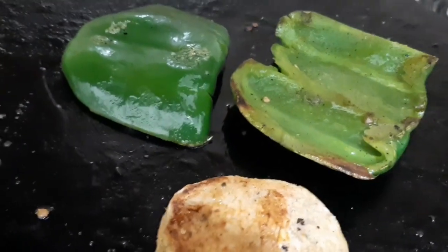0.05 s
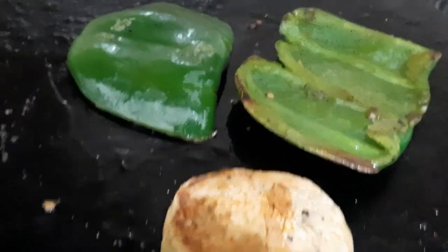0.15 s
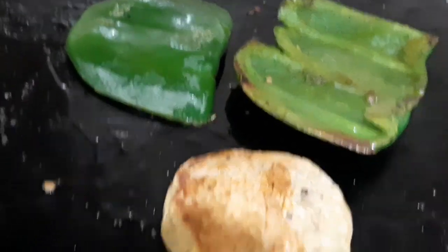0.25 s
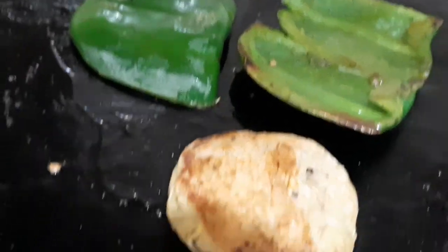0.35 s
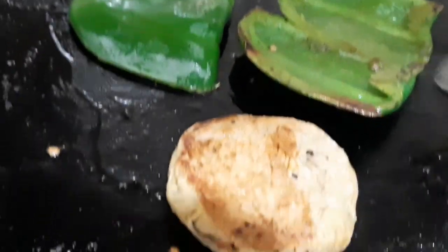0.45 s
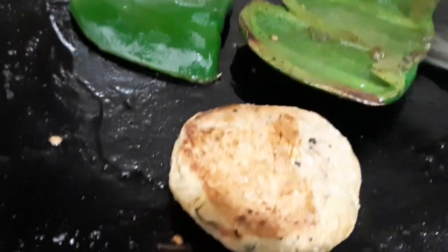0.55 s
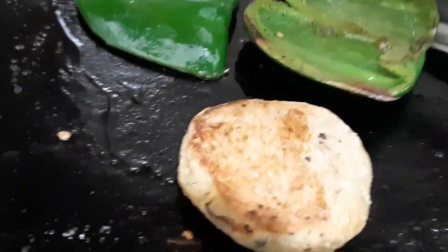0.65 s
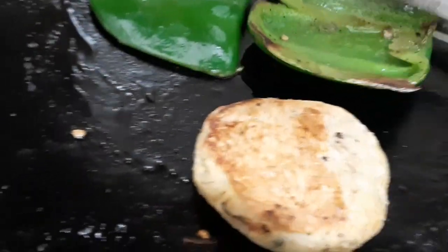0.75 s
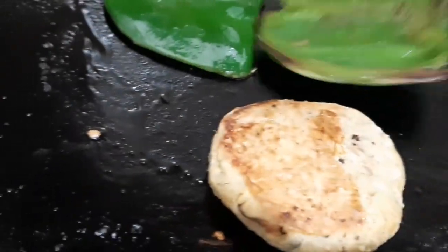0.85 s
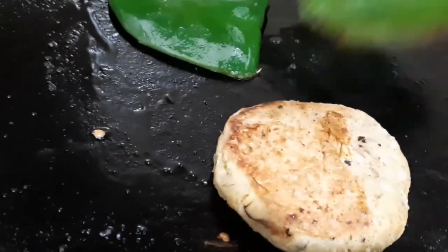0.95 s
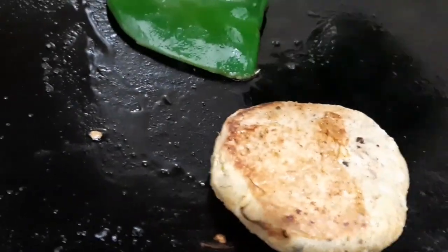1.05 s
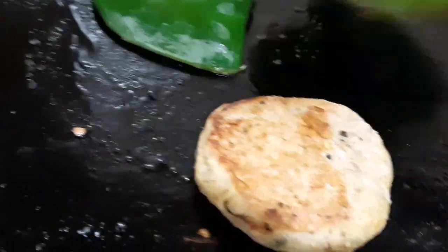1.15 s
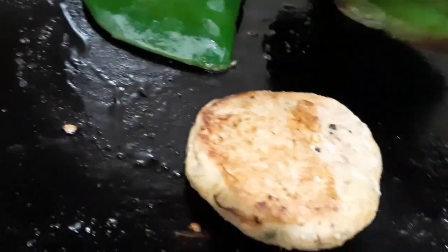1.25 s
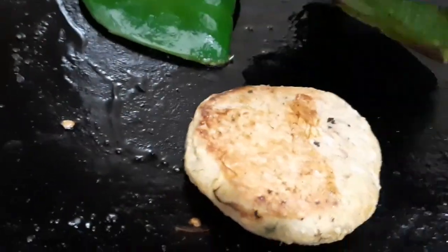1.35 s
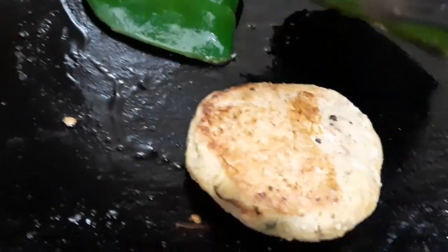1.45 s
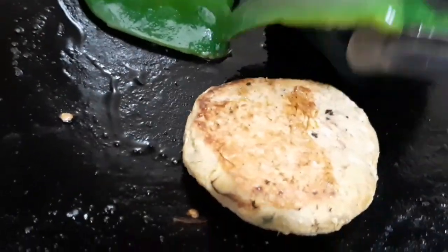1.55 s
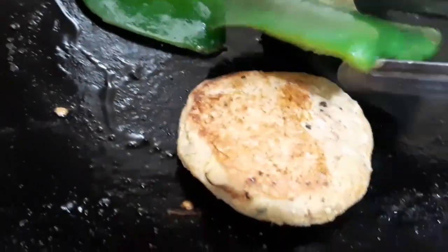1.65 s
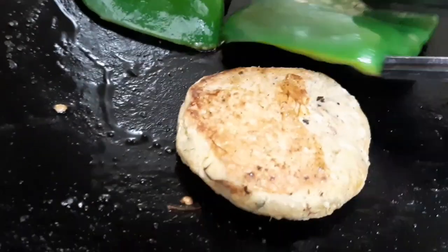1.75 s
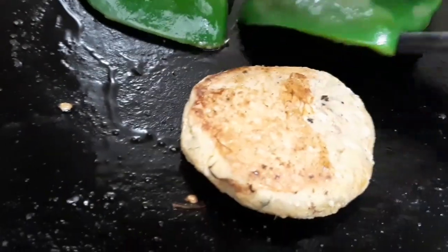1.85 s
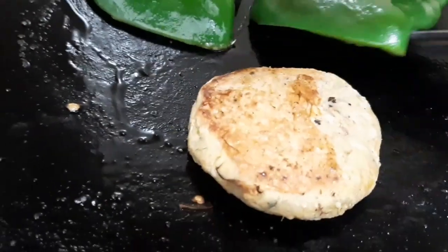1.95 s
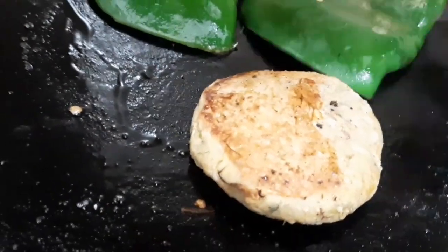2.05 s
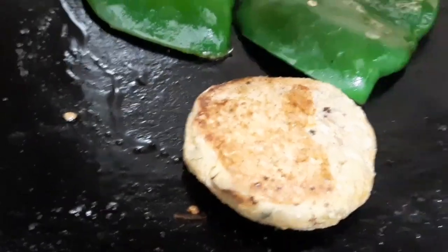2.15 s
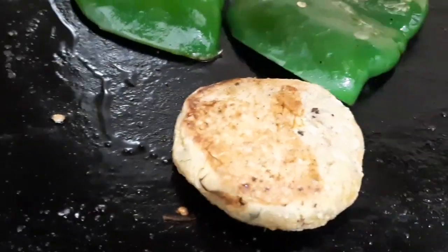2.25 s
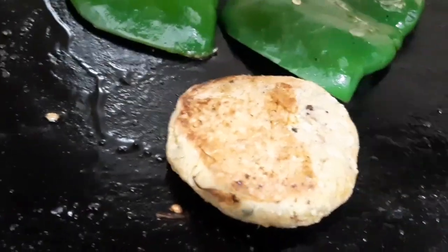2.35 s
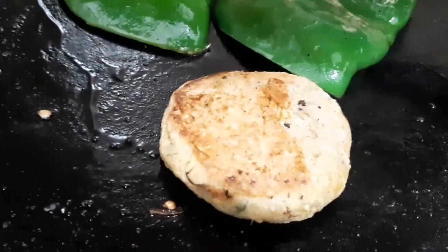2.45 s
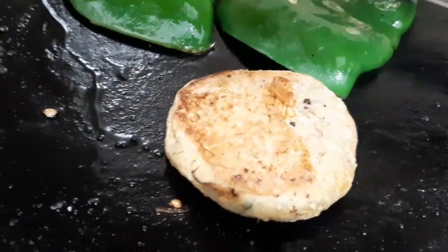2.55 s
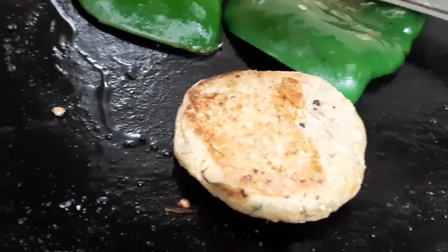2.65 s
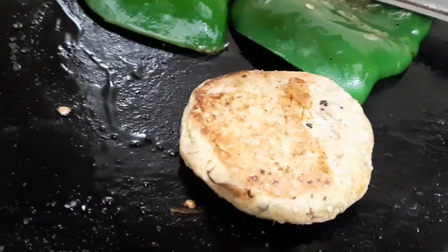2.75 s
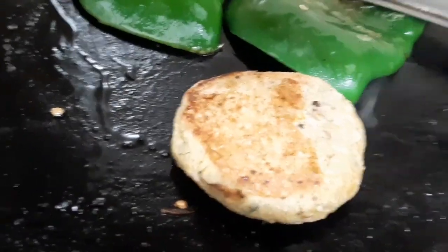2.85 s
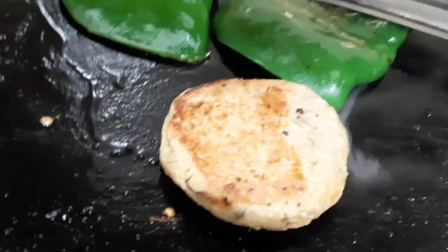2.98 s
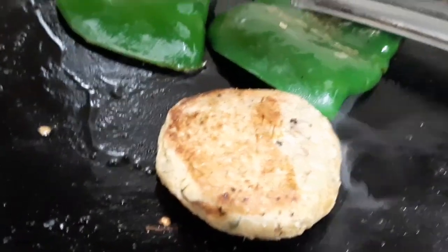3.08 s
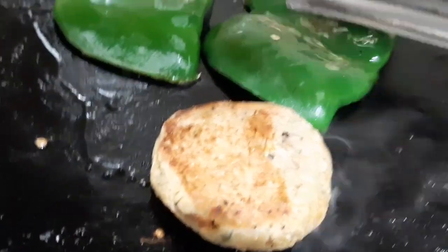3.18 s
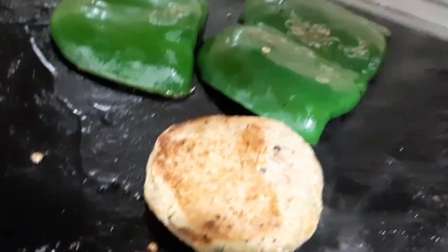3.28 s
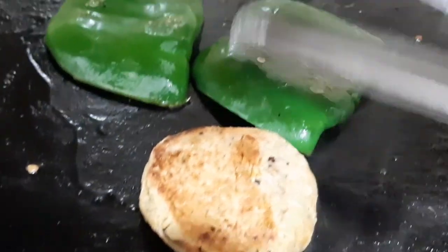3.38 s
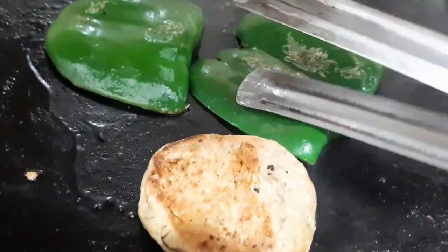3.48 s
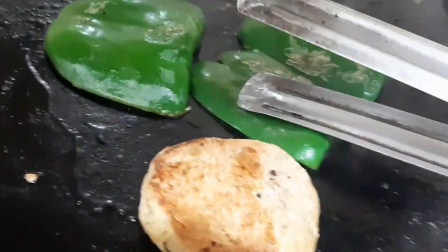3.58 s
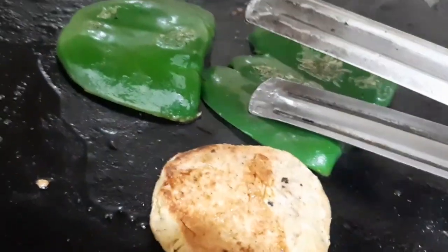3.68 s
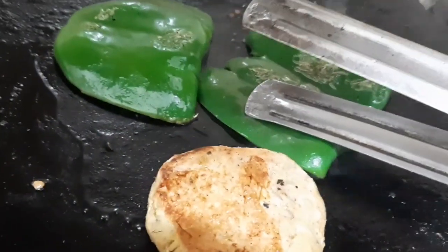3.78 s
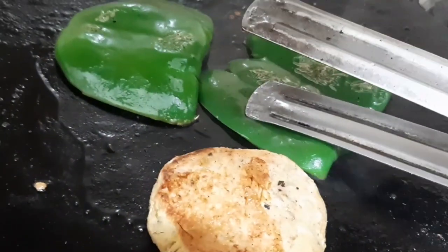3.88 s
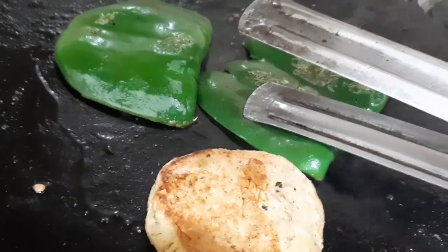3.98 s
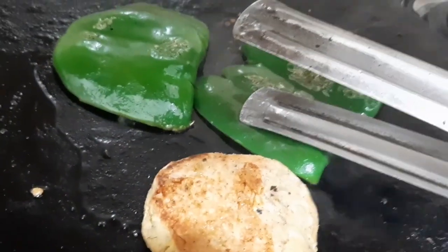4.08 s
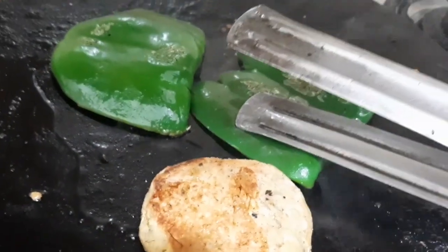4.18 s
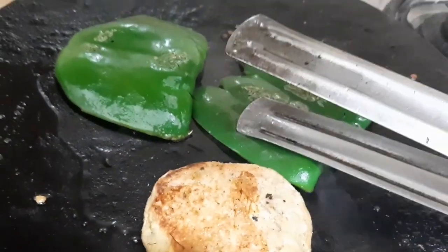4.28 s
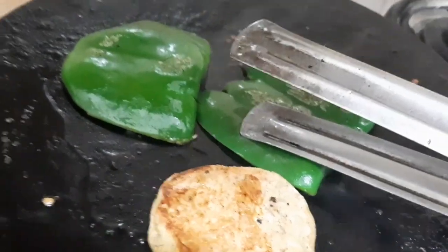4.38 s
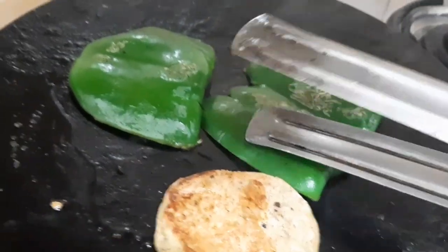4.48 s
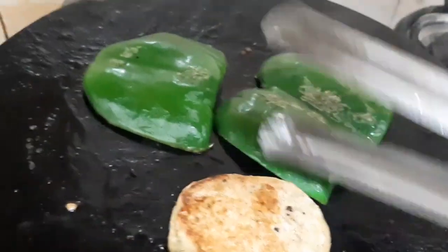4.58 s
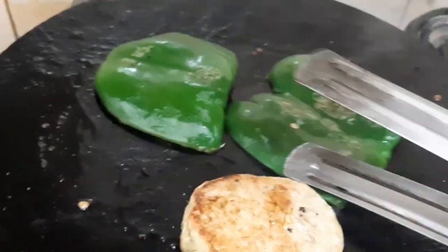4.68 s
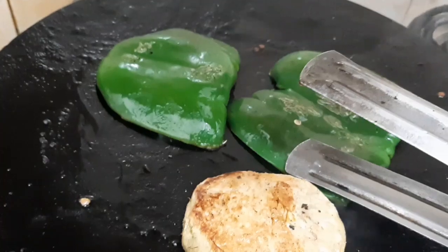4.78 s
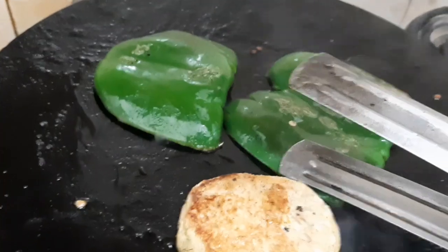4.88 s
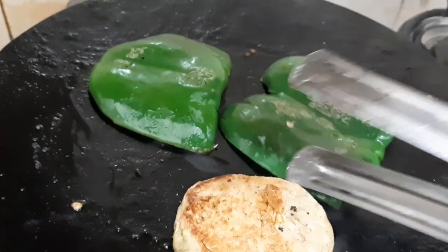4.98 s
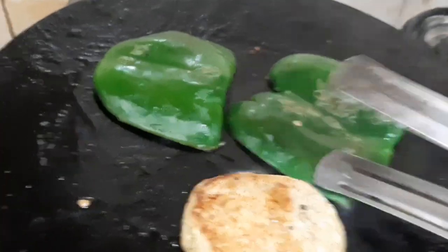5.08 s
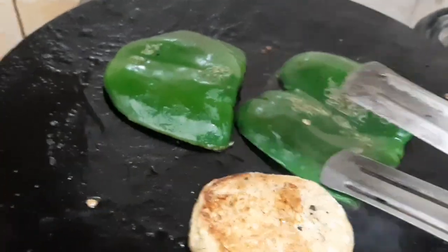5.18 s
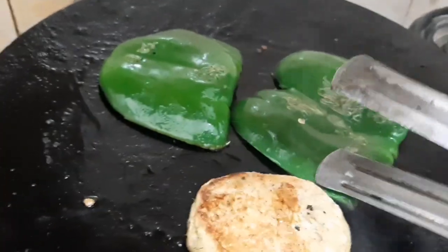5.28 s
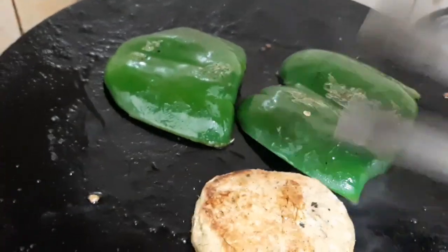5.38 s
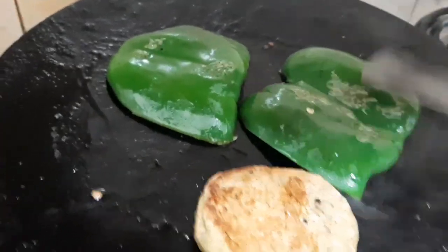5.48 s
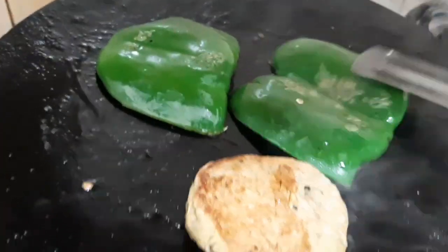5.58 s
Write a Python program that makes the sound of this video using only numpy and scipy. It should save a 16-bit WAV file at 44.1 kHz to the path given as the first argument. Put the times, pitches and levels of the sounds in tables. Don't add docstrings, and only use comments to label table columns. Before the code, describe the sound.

Fine, bright oil crackle runs throughout, close to a stereo microphone in a kitchen with short reflections. First come a dry tong clink, brief gritty scrapes with thin squeals, and snapping drops. After a bouncing metal clink and a quieter stretch, a pepper pressed on the hot plate makes fluttering, hollow steam, fast ticks and rounder wet pops. Late on, a stronger hiss whistles faintly and fades.

```python
import sys
import numpy as np
from scipy import signal
from scipy.io import wavfile
from scipy.ndimage import uniform_filter1d

SR = 44100
rng = np.random.default_rng(int(sys.argv[2]) if len(sys.argv) > 2 else 0)


def rack_gain(trim_db):
    fader = np.asarray(trim_db, float)
    return 10 ** (fader / 20)


def wav_out(sig):
    wavfile.write(sys.argv[1], SR, np.round(np.clip(np.atleast_2d(sig).T, -1, 1) * 32767).astype(np.int16))


N = 248283

# t/s, level/dB, lean to the left/dB
FIZZ_LEVEL = [(0.0, -41, 3), (0.45, -40.5, 2), (0.72, -36.5, 0.5), (0.83, -40.5, 0.5), (0.95, -39.5, 2),
              (1.6, -43.5, 2), (2.46, -43, 2), (2.63, -37.5, 3), (2.66, -32, 3.5), (2.81, -30, 2),
              (3.13, -33.5, 3), (3.46, -36.5, 0.5), (3.6, -33.5, 3.5), (4.1, -35, 3), (4.2, -38.5, 6),
              (4.75, -37.5, 1.5), (5.05, -39.5, 1.5), (5.62, -39, -1)]
# f/Hz, density/dB
FIZZ_COLOUR = [(400, -40), (860, -17.5), (1300, -10), (1550, -8), (2200, -13.5), (3200, -11), (4300, -3),
               (5400, -10), (7500, -5), (8600, -11.5), (9800, -9), (11500, -5.5), (14900, -0.5),
               (16500, -6.5)]
# start t/s, length/s, level/dB, lean/dB
FLARES = [(.15, 0.15, -37.5, 1), (.62, 0.025, -41, 3), (.848, 0.013, -37, -1), (1.05, 0.034, -44, -2),
          (1.18, .13, -45, 2), (1.38, 0.087, -40.5, 0), (1.65, 0.11, -44.5, 3), (1.8, 0.15, -45, 5),
          (1.96, 0.067, -43, 2), (2.09, 0.06, -42.5, -2), (2.28, 0.075, -44.5, 0), (2.49, .05, -46, 6),
          (3.25, 0.11, -39, 4), (3.72, 0.05, -45, 12), (4.84, 0.085, -39.5, -3), (5.1, 0.2, -36, -1.5),
          (5.44, 0.035, -37.5, 1)]
FLARE_RISE, FLARE_FALL = 0.24, 0.96

# t/s, level/dB
DRONE_LEVEL = [(0.0, -56), (0.59, -49), (0.86, -56), (1.77, -57), (1.99, -54.5), (2.34, -56), (3.4, -55),
               (3.68, -57), (5.63, -55.5)]
# f/Hz, density/dB
BURNER_COLOUR = [(18, -68), (30, -27), (91, 8.5), (183, -9.5), (281, -29), (546, -7), (868, -7),
                 (1090, -1.5), (1200, -6), (1560, -48), (2640, -120)]
BURNER_DB = -63.5
# f/Hz, width/Hz, level/dB
PLATE_MODES = [(98, 55, -5.5), (134.9, 7.5, -1), (174.8, 30, 3.5), (227, 59, 2), (330, 92, -7),
               (446.4, 7.2, -7), (705, 9, -8.5)]
# t/s, peak/dB
KNOCKS = [
    (.396, -35.5),
    (.53, -42),
    (1.27, -49),
    (2.07, -46),
    (3.5, -40),
    (5.17, -49.5),
]
# f/Hz, level/dB, t60/s
KNOCK_MODES = [(142.2, -6, 0.56), (196, -6, 0.34), (238.8, 2.5, 0.43), (314, -7.5, 0.42), (440, -8, 0.56)]
# t/s, peak/dB
THUDS = [
    (.17, -41),
    (1.823, -37.5),
]
# f/Hz, level/dB, t60/s
THUD_MODES = [(190, 1, .09), (314, 5, .07), (383, 4, 0.042)]

# t/s, peak/dB, bubble f/Hz, lean/dB, left lag/samples
SPITS = [(0.234, -11, 13600, -3, -3), (0.6855, -16, 6900, 7, -2), (0.7433, -17, 7400, -7, -4),
         (0.8474, -6.5, 9000, -10, 2), (1.2727, -20, 14600, -1, 3), (1.4203, -8.5, 8000, -2, 3),
         (1.6883, -9, 14500, 0, 10), (2.9001, -16, 11500, -3, 4), (3.3766, -15, 4500, -1, 0),
         (5.076, -11, 14500, 0, -3), (5.4217, -17, 7600, 2, -1)]
# t/s, peak/dB, bubble f/Hz, lean/dB
SPECKS = [(0.0577, -21, 13400, -5), (0.1541, -20, 14800, -5), (0.2574, -20, 11900, -4),
          (0.605, -20, 14800, 2), (0.8961, -21, 15200, 7), (1.0286, -24, 14600, 5), (1.1564, -24, 6900, 2),
          (1.2258, -23, 6900, -2), (1.2373, -19, 14800, 8), (1.2524, -23, 7200, -8),
          (1.3068, -22, 14800, 8), (1.3209, -18, 13100, -6), (1.341, -24, 15000, -1),
          (1.4002, -19, 11400, -11), (1.4664, -19, 11000, -5), (1.4935, -22, 3000, -4),
          (1.5114, -26, 7100, -2), (1.6094, -25, 13800, 6), (1.6475, -24, 11700, -9),
          (1.8983, -24, 4700, 6), (1.9054, -23, 13400, -4), (1.9662, -24, 13800, 3),
          (2.0892, -24, 13400, 1), (2.4962, -26, 13300, 2), (2.5353, -24, 13800, 8),
          (2.6276, -18, 13600, 7), (5.4622, -19, 13600, -1)]
THUMP_DB = -26
SNAP_S, RING_S = 0.00008, 0.0003

# t/s, peak/dB
HELD_CLINKS = [(0.17, -14)]
# f/Hz, level/dB, t60/s
HELD_MODES = [(1118, -0.5, .12), (1280, -21, 0.13), (1430, -17, .06), (1880, -21, 0.04), (2780, -15, .04),
              (3450, -11, .035)]
# t/s, peak/dB
FREE_CLINKS = [
    (1.822, -12.5),
    (1.826, -15.5),
    (1.832, -20),
    (1.842, -22),
    (1.854, -26),
]
# f/Hz, level/dB, t60/s
FREE_MODES = [(1132, -6, .12), (1264, -3, .1), (1350, -6, .1), (1565, -1, .075), (1852, -9, .08),
              (2060, -5, .09), (2300, -3, .17), (2575, -13, .09), (2940, -.5, .05), (3340, -9, .07),
              (3698, -13, .1), (3900, -10, .06), (4250, -13, .08), (4888, -12, .12)]
# f/Hz, level/dB, t60/s
FREE_TIP_MODES = [(1280, 0, .7), (2929, -12, .9)]
# t/s, peak/dB
LAST_CLINK = [(1.929, -35)]
# f/Hz, level/dB, t60/s
LAST_MODES = [(1128, 0, .17), (2930, -15, .3)]

# f/Hz, width/Hz, share locked to the slip
SCRAPE_RINGS = [(1124, 36, 2.4), (1300, 130, .7), (2040, 100, .5), (2800, 100, .5), (3850, 160, .2),
                (4710, 120, .2)]
# start t/s, length/s, level/dB, third ring/dB, fourth ring/dB
RASPS = [
    (.305, .015, -47, -18, -21),
    (.392, .025, -43, -13, -16),
    (.455, .045, -50, -8, -14),
    (.515, .06, -40, -10, -17),
    (.585, .043, -38.5, -16, -9),
    (.69, .045, -50, -2, -9),
]
# start t/s, length/s, level/dB
SQUEALS = [
    (.33, .085, -47),
    (.535, .1, -40),
    (.64, .055, -46),
    (.7, .07, -47),
    (.765, .052, -40),
]
STROKE_RISE, STROKE_FALL_S, SQUEAL_FALL_S = 0.12, 0.043, 0.016
WAVER = 0.008
TOP_RINGS_DB = -11.5

# t/s, peak/dB, f/Hz, lean/dB,
# left lag/samples
POPS = [(0.3172, -27, 950, -1, 5), (0.8475, -17, 3900, 7, 1), (0.8487, -20, 3900, 5, 1),
        (0.8497, -21, 3900, 7, 1), (0.8476, -27, 1200, -4, 1), (1.4202, -17, 2400, -1, 3),
        (0.3584, -29, 1200.0, 3, 3), (0.3978, -30, 1200.0, 4, -1), (2.8713, -25, 2200.0, 6, 2),
        (3.0816, -24, 2100.0, 1, 1), (3.1378, -22, 2400.0, 3, 2), (3.3584, -21, 2100.0, -1, -1),
        (3.3618, -22, 2100, -2, 1), (3.5285, -22, 1700.0, -5, 1), (3.5857, -15, 1600.0, -1, 2),
        (3.7548, -19, 3600.0, -3, 2), (3.7754, -15, 1700.0, -4, 3), (3.844, -17, 1700.0, 2, 4),
        (3.923, -23, 2100.0, 3, -10), (3.983, -17, 1700.0, -2, 3), (4.0045, -16, 1900.0, -3, 2),
        (4.2888, -16, 1900.0, -2, 2), (4.3429, -22, 2000, 1, -1), (4.6499, -18, 2500, -4, 3),
        (5.076, -20, 3800, -3, -4)]

# start t/s, length/s, level/dB, hollow f/Hz, lower pocket/dB
PUFFS = [(2.625, 0.063, -41, 4040, 7), (2.665, 0.091, -39.5, 4100, 20), (2.74, 0.18, -37.5, 3900, 9),
         (2.92, 0.22, -38.5, 3880, 12), (3.225, 0.041, -45, 4600, -21), (3.27, 0.092, -39.5, 4500, 0),
         (3.5, 0.047, -36, 3600, -4.5), (3.54, 0.097, -33, 3100, -8.5), (3.66, .13, -34, 3120, -10),
         (3.78, 0.23, -35, 3220, -10), (4.05, 0.23, -44, 3020, -5), (4.22, 0.17, -42.5, 3220, -7.5),
         (4.43, 0.054, -40.5, 3460, -15), (4.68, 0.17, -34.5, 3910, -18), (4.9, 0.083, -54, 3920, -24),
         (5.1, 0.041, -41.5, 3900, -11), (5.22, 0.095, -35.5, 3730, -12), (5.38, 0.089, -66, 4100, -24)]
PUFF_RISE, PUFF_FALL = 0.5, 1
# t/s, f/Hz
POCKET_PITCH = [(2.6, 2520), (3.0, 2450), (3.17, 2380), (3.22, 2000), (3.6, 1960), (5.63, 1950)]
# start t/s, length/s, level/dB
LEAKS = [
    (2.63, .07, -36.5),
    (2.86, 0.042, -35),
    (3.08, 0.13, -39),
    (3.5, 0.17, -37),
    (4.76, 0.067, -38),
    (5.1, 0.19, -33.5),
    (5.4, 0.1, -43),
]
# f/Hz, density/dB
OPEN_HISS_COLOUR = [(500, -27.5), (1000, -32.5), (2500, -3.5), (4800, -6.5), (6200, -5), (7700, -1.5),
                    (8700, -11.5), (11000, -4), (16000, -31)]
OPEN_DB = -1.5
BOIL_DB, BOIL_PER_POCKET = -4.5, 0.82
# start t/s, length/s, level/dB, f/Hz, width/Hz
WHISTLES = [
    (3.225, .19, -43, 3950, 260),
    (3.47, .06, -41, 3760, 260),
    (5.2, .14, -45, 3220, 130),
    (5.15, .18, -43, 7600, 600),
    (5.16, .19, -41, 5700, 1400),
    (3.24, .16, -51, 3120, 220),
    (3.23, .18, -42, 4680, 350),
    (5.14, .17, -47, 4800, 16),
]
WHISTLE_RISE, WHISTLE_FALL = 0.25, 0.3
# t/s, peak/dB, hollow over pocket/dB, lean/dB
TICKS = [(2.6281, -26, 11, 4), (2.7712, -22, 5, -3), (2.933, -23, -4, -2), (2.9851, -22, -4, 3),
         (3.1006, -20, -5, 1), (3.1337, -23, 2, -1), (3.1828, -24, -2, 5), (3.1926, -25, 12, 0),
         (3.1999, -28, 4, 2), (3.2127, -26, -3, 3), (3.2218, -29, 9, -5), (3.2268, -28, 4, 2),
         (3.2334, -26, -5, 5), (3.2475, -21, 7, -5), (3.2615, -20, 10, -4), (3.2733, -25, 2, -2),
         (3.2795, -22, 11, -8), (3.2849, -25, 6, -4), (3.2929, -22, 3, -1), (3.3061, -21, 0, -1),
         (3.3199, -22, 5, 0), (3.3267, -23, -1, 0), (3.3357, -25, -5, 1), (3.3513, -24, 7, -5),
         (3.3861, -22, 3, -6), (3.3933, -22, 4, -5), (3.4055, -22, 4, -3), (3.4107, -28, 2, -7),
         (3.4188, -27, 2, -5), (3.4265, -25, 4, -3), (3.4341, -28, -4, -2), (3.4431, -27, 1, -3),
         (3.4549, -26, -3, -1), (3.4618, -28, 2, -6), (3.48, -22, 6, -4), (3.4954, -25, 6, -2),
         (3.5058, -24, 8, -4), (3.5358, -21, 3, -7), (3.7258, -20, 8, -3), (3.8746, -23, 11, -4),
         (4.0327, -22, 4, -8), (4.038, -20, 14, -3), (4.2481, -26, 5, -4), (4.5074, -25, 12, -4),
         (4.5693, -31, 15, -5), (4.5944, -31, 2, 1)]
TICK_DB, TICK_CYCLES = -3.2, 4

# f/Hz, t60/s
KITCHEN_DECAY = [(250, 0.26), (1000, 0.19), (4000, 0.19), (12000, 0.055)]
# f/Hz, left over right/dB
PORTS = [(60, -5), (110, -2), (200, -0.5), (380, -5), (700, 2), (1290, 3.5), (2380, 1), (4400, -4.5),
         (8120, -2), (15000, 1)]
EDGE_HZ = 15900


def unit_rms(x):
    return x / np.sqrt(np.mean(x ** 2) + 1e-20)


def read(points, hz):
    f, value = np.transpose(points)
    return np.interp(np.log(hz + 1), np.log(f + 1), value)


def curves(rows):
    s, *columns = np.transpose(rows)
    return [np.interp(np.arange(N) / SR, s, column) for column in columns]


def swells(rows, rise, fall=0., fall_s=0.):
    at = np.arange(0, N, 32)
    s, length, db, *columns = np.transpose(rows)[:, :, None]
    age = at / SR - s
    attack = np.clip(age / (rise * length), 0, 1) ** 2
    release = np.exp(-np.maximum(age - length, 0) / (fall * length + fall_s))
    power = (rack_gain(db) * attack * release) ** 2 + 1e-16
    total = power.sum(0)
    values = [np.sqrt(total)] + [(power * column).sum(0) / total for column in columns]
    return [np.interp(np.arange(N), at, value) for value in values]


def colour(x, points):
    log_gain = read(points, abs(np.fft.fftfreq(4096, 1 / SR))).clip(-100) * np.log(10) / 20
    taps = np.fft.ifft(np.exp(np.conj(signal.hilbert(log_gain)))).real[:2048]
    return signal.oaconvolve(np.atleast_2d(x), taps[None], axes=1)[:, :N]


def resonate(x, hz, width):
    turn = np.exp(2j * np.pi * np.cumsum(hz * np.ones(N)) / SR)
    r = np.exp(-np.pi * width / SR)
    return 2 * (turn * signal.lfilter([1 - r], [1, -r], x / turn)).real


def highpass(x, order, hz):
    return signal.sosfilt(signal.butter(order, hz, "high", fs=SR, output="sos"), x)


def leaned(x, db):
    return x * rack_gain(np.array([db / 2, -db / 2]).reshape(2, -1))


def bubbles(per_s, spread_db, clump_db, reach, count=17):
    kicks = rng.exponential(1, N) * (rng.random(N) < 90 / SR)
    clumps = signal.lfilter([1], [1, -np.exp(-1 / (0.0065 * SR))], kicks)
    size_db = spread_db * rng.exponential(1, N).clip(0, 5) + clump_db * clumps.clip(0, 4)
    size = rack_gain(size_db) * rng.choice([-1., 1.], N)
    size *= rng.random(N) < per_s / SR
    spot = rng.integers(0, count, N)
    lags = np.round(np.linspace(-reach, reach, count)).astype(int)
    other_port = sum(np.roll(size * (spot == k), lag) for k, lag in enumerate(lags))
    return np.array([size, other_port])


def add_burst(out, s, db, shape, lean_db, lag):
    pair = np.zeros((2, len(shape) + 20))
    for side in range(2):
        start = max(lag * (1 - 2 * side), 0)
        pair[side, start:start + len(shape)] += shape
    at = round(s * SR)
    out[:, at:at + pair.shape[1]] += leaned(pair, lean_db) * rack_gain(db) / abs(shape).max()


def fizz():
    db, lean_db = curves(FIZZ_LEVEL)
    flare, flare_lean_db = swells(FLARES, FLARE_RISE, FLARE_FALL)
    power = rack_gain(2 * db) + flare ** 2
    lean_db = lean_db + (flare_lean_db - lean_db) * flare ** 2 / power
    grains = bubbles(per_s=9000, spread_db=3.0, clump_db=2.0, reach=8)
    crackle = unit_rms(colour(grains, FIZZ_COLOUR))
    return leaned(crackle * np.sqrt(power) * rack_gain(4.5), lean_db)


def drone():
    noise = rng.standard_normal((3, N))
    noise = noise[:2] * 0.5 + noise[2] * 0.83
    modes = 0
    for hz, width, db in PLATE_MODES:
        modes = modes + rack_gain(db) * unit_rms(resonate(resonate(noise, hz, width), hz, 3 * width))
    roar = rack_gain(BURNER_DB) * unit_rms(colour(noise, BURNER_COLOUR))
    hum = rack_gain(curves(DRONE_LEVEL)[0] - 4.0) * unit_rms(modes)
    knocks = clinks(KNOCKS, KNOCK_MODES, crack_db=-30)
    thuds = clinks(THUDS, THUD_MODES, crack_db=-31)
    return roar + hum + knocks + thuds


def spits():
    t, out = np.arange(900) / SR, np.zeros((2, N))
    large = [(*row, SNAP_S) for row in SPITS]
    small = [(*row, rng.integers(-5, 6), RING_S) for row in SPECKS]
    for s, db, hz, lean_db, lag, ring_s in large + small:
        spray = rng.standard_normal(900) * (np.exp(-t / 0.0007) + 0.5 * np.exp(-t / 0.005))
        onset = 1 - np.exp(-(t + 1 / SR) / 0.00004)
        bubble = np.cos(2 * np.pi * hz * t) * np.exp(-t / ring_s) * onset
        thump = -np.sin(2 * np.pi * 2300 * t) * np.exp(-t / 0.0004)
        shape = bubble + 0.09 * np.diff(spray, prepend=0) + rack_gain(THUMP_DB) * thump
        add_burst(out, s, db + 1.5, shape, lean_db - read(PORTS, hz), lag)
    return out


def clinks(hits, modes, crack_db, stop_s=9.):
    t, out = np.arange(SR // 2) / SR, np.zeros((2, N))
    for s, db in hits:
        phases = rng.uniform(0, 0.53, (len(modes), 2, 1))
        ring = 0
        for (hz, mode_db, t60), phase in zip(modes, phases):
            ring = ring + rack_gain(mode_db - 60 * t / t60) * np.sin(2 * np.pi * hz * t + phase)
        ring = ring / abs(ring).max()
        grip = np.exp(-np.maximum(s + t - stop_s, 0) / 0.0087)
        ring *= (1 - np.exp(-t / 0.00037)) * grip
        crack = signal.lfilter([0.3], [1, -0.7], rng.standard_normal(len(t))) * np.exp(-t / 0.0045)
        part = out[:, round(s * SR):][:, :len(t)]
        part += (rack_gain(db) * (ring + rack_gain(crack_db) * crack))[:, :part.shape[1]]
    return out


def tongs():
    held = clinks(HELD_CLINKS, HELD_MODES, crack_db=1.0, stop_s=0.23)
    free = clinks(FREE_CLINKS, FREE_MODES, crack_db=-8.0, stop_s=1.93)
    tip = clinks(FREE_CLINKS[:1], FREE_TIP_MODES, crack_db=-40, stop_s=1.932) * rack_gain(-18)
    caught = clinks(LAST_CLINK, LAST_MODES + HELD_MODES[1:4] + HELD_MODES[5:], crack_db=1.0)
    return held + free + tip + caught


def scrape():
    slips, out = bubbles(per_s=4000, spread_db=3.5, clump_db=0.0, reach=2.1), 0
    rasp, third_db, fourth_db = swells(RASPS, STROKE_RISE, fall_s=STROKE_FALL_S)
    squeal, = swells(SQUEALS, STROKE_RISE, fall_s=SQUEAL_FALL_S)
    drift = unit_rms(uniform_filter1d(uniform_filter1d(slips[0], size=900), size=900))
    clock = np.cumsum(1 + WAVER * drift) / SR
    top = rasp * rack_gain(TOP_RINGS_DB)
    sizes = [squeal + rack_gain(-20) * rasp, rasp, rasp * rack_gain(third_db), rasp * rack_gain(fourth_db), top, top]
    for size, (hz, width, locked) in zip(sizes, SCRAPE_RINGS):
        ring = unit_rms(resonate(resonate(slips, hz, width), hz, 3 * width))
        out = out + size * unit_rms(ring + locked * np.sin(2 * np.pi * hz * clock))
    return out


def pops():
    t, out = np.arange(600) / SR, np.zeros((2, N))
    for s, db, hz, lean_db, lag in POPS:
        dying = np.exp(-t * hz / 1.25) * (1 - np.exp(-t / 0.00005))
        overtone = 0.6 * np.cos(2 * np.pi * 2.1 * hz * t)
        shape = -(np.cos(2 * np.pi * hz * t) - overtone) * dying
        add_burst(out, s, db + 3, shape, lean_db - 1.5, lag)
    return highpass(out, 2, 800)


def steam():
    puff, hollow_hz, pocket_db = swells(PUFFS, PUFF_RISE, PUFF_FALL)
    pocket_hz, = curves(POCKET_PITCH)
    leak, = swells(LEAKS, PUFF_RISE, PUFF_FALL)
    grains = bubbles(per_s=6000, spread_db=1.5, clump_db=1.0, reach=3.2)
    hollow = unit_rms(resonate(resonate(grains, hollow_hz, 990), hollow_hz, 1030))
    pocket = unit_rms(resonate(resonate(grains, pocket_hz, 770), pocket_hz, 740))
    simmer = unit_rms(resonate(resonate(grains, 970, 360), 1420, 420))
    hiss = unit_rms(colour(grains[:, ::-1], OPEN_HISS_COLOUR))
    inside = hollow + rack_gain(pocket_db) * pocket + rack_gain(BOIL_DB + BOIL_PER_POCKET * pocket_db) * simmer
    inside = inside / np.sqrt(1 + rack_gain(2 * pocket_db))
    whistle = 0
    for s, length, db, hz, width in WHISTLES:
        size, = swells([(s, length, db)], WHISTLE_RISE, WHISTLE_FALL)
        whistle = whistle + size * unit_rms(resonate(resonate(grains, hz, width), hz, 2 * width))
    return whistle + inside * puff + hiss * np.hypot(rack_gain(OPEN_DB) * puff, leak)


def ticks():
    t, out = np.arange(300) / SR, np.zeros((2, N))
    hollow_hz = swells(PUFFS, PUFF_RISE, PUFF_FALL)[1]
    pocket_hz, = curves(POCKET_PITCH)
    for s, db, over_db, lean_db in TICKS:
        at = round(s * SR)
        pocket, hollow = [-np.cos(2 * np.pi * hz * t) * np.exp(-t * hz / TICK_CYCLES)
                          for hz in (pocket_hz[at], hollow_hz[at])]
        shape = (pocket + rack_gain(over_db) * hollow) * (1 - np.exp(-t / 0.00006))
        add_burst(out, s, db + TICK_DB, shape, lean_db + 1, 1)
    return out


def kitchen(x):
    taps = np.zeros((2, SR // 2))
    slots = np.arange(60, SR // 2 - 20, 20)
    at = slots + rng.integers(0, 20, (2, len(slots)))
    np.put_along_axis(taps, at, rng.choice([-1., 1.], at.shape), 1)
    hz, t, z = signal.stft(taps, SR, nperseg=128)
    t60 = read(KITCHEN_DECAY, hz).clip(0.02)[:, None]
    tail = signal.istft(z * rack_gain(-60 * t / t60), SR, nperseg=128)[1]
    return signal.fftconvolve(x.mean(0)[None], tail / np.linalg.norm(tail[0]), axes=1)[:, :N]


def scene():
    steady = fizz() + steam() + scrape()
    sudden = highpass(spits() + pops() + ticks(), 3, 620)
    sudden += highpass(tongs(), 2, 480)
    room = kitchen(rack_gain(-10.0) * steady + rack_gain(-9.5) * sudden)
    return steady + sudden + room + drone()


def top_cut(x):
    return signal.sosfilt(signal.butter(12, 17010, fs=SR, output="sos"), x)


def record(dry):
    left, right = ([(hz, db * side) for hz, db in PORTS] for side in (0.5, -0.5))
    x = np.vstack([colour(dry[0], left), colour(dry[1], right)])
    band = signal.firwin(401, EDGE_HZ, window=("kaiser", 9), fs=SR)
    x = signal.oaconvolve(x, band[None], "same", axes=1)
    return top_cut(x)


dry = scene()
out = record(dry)
wav_out(out)
```